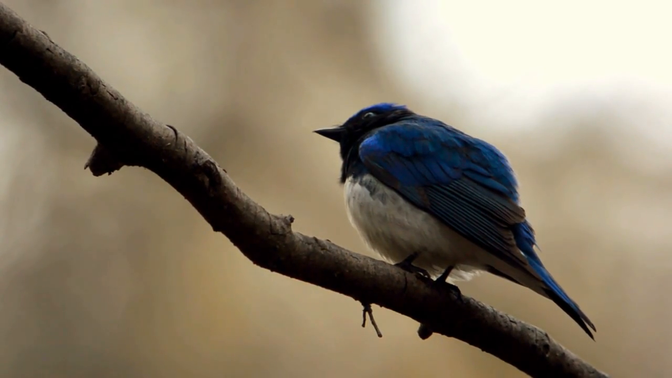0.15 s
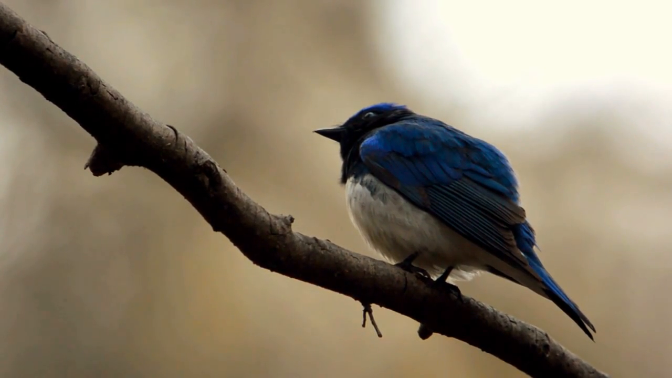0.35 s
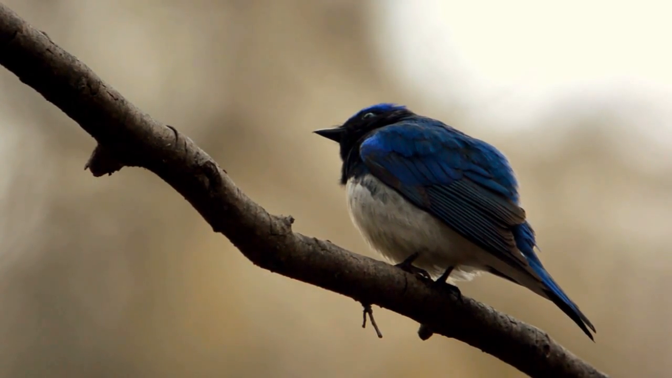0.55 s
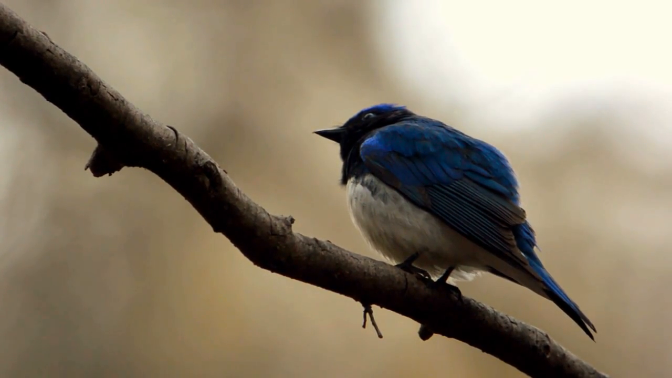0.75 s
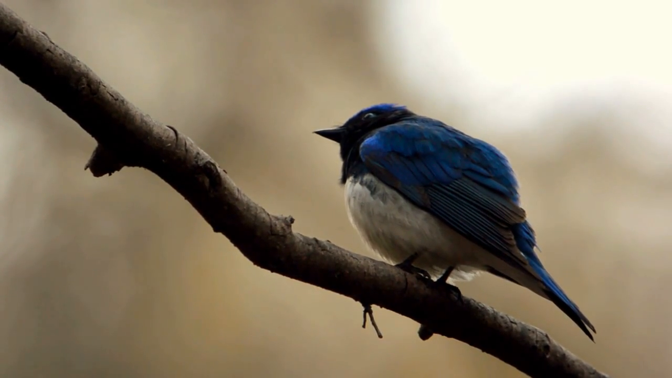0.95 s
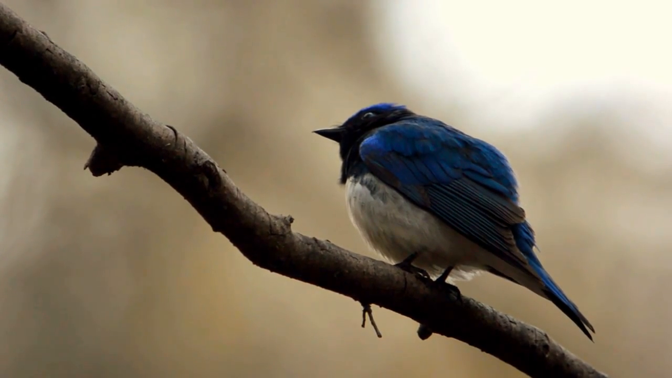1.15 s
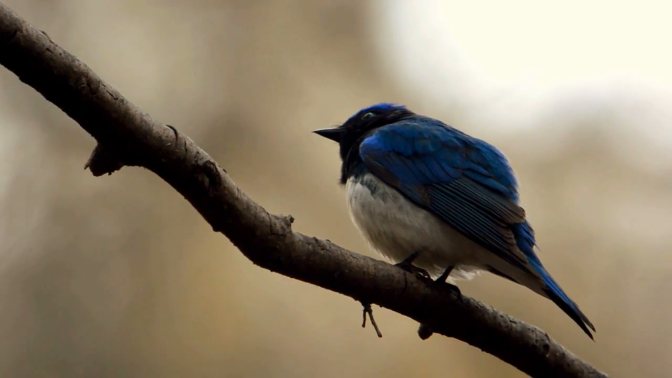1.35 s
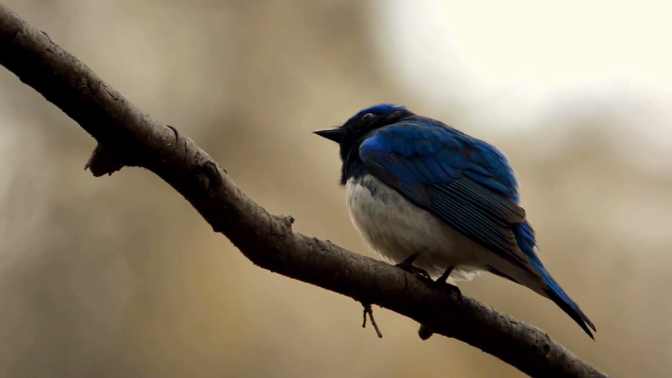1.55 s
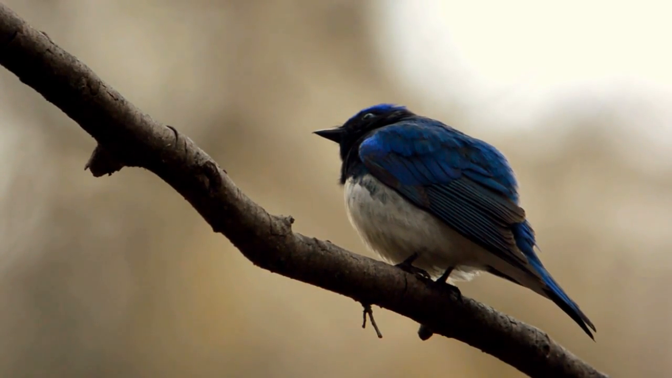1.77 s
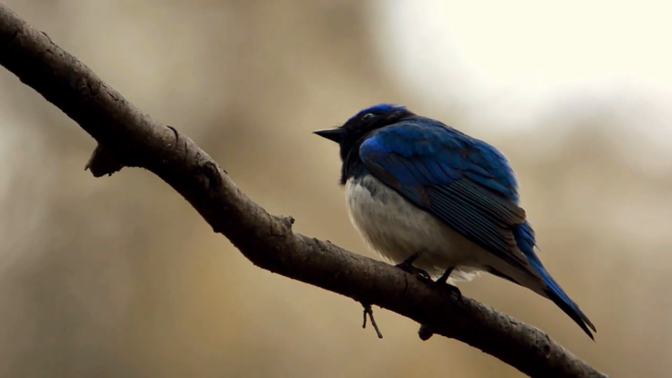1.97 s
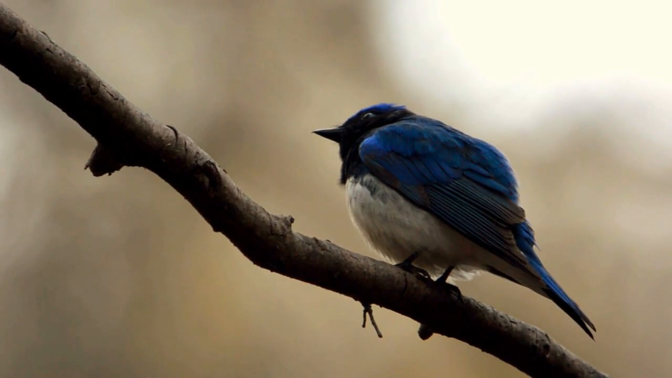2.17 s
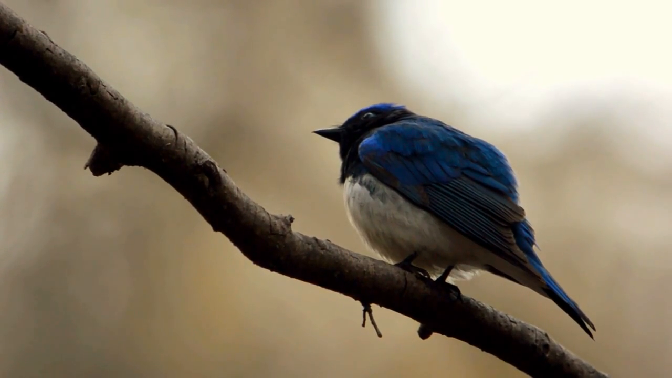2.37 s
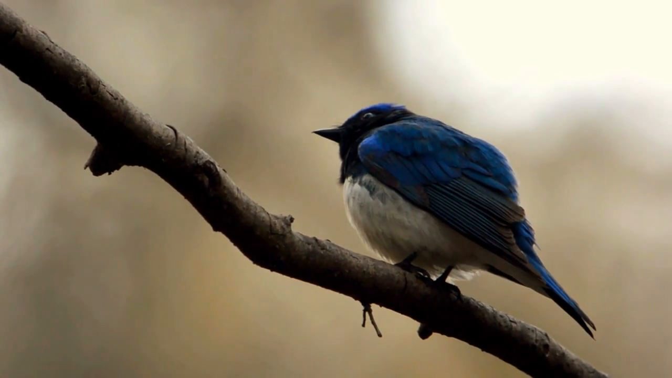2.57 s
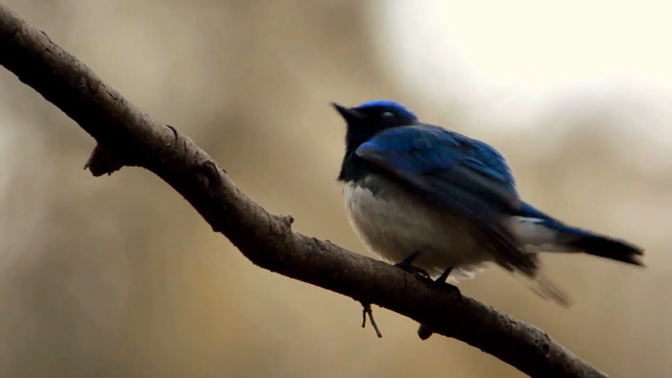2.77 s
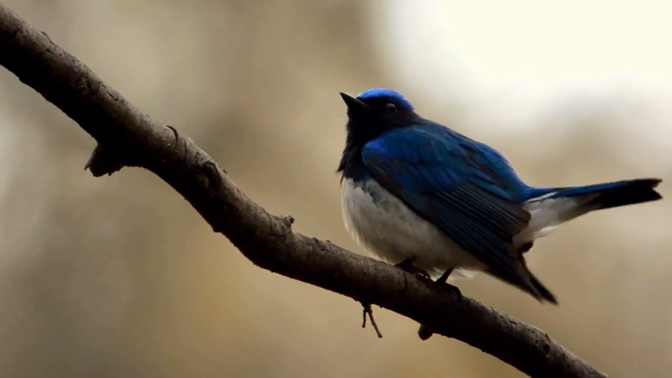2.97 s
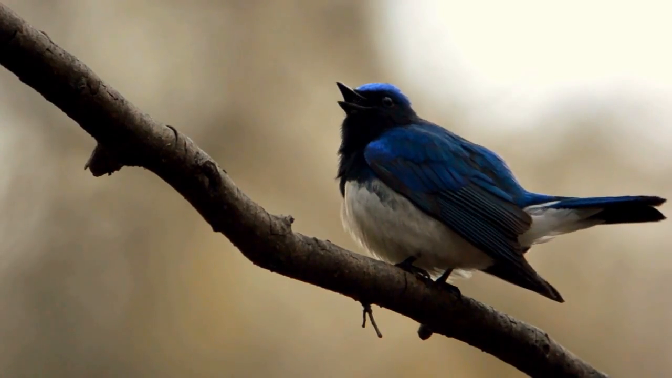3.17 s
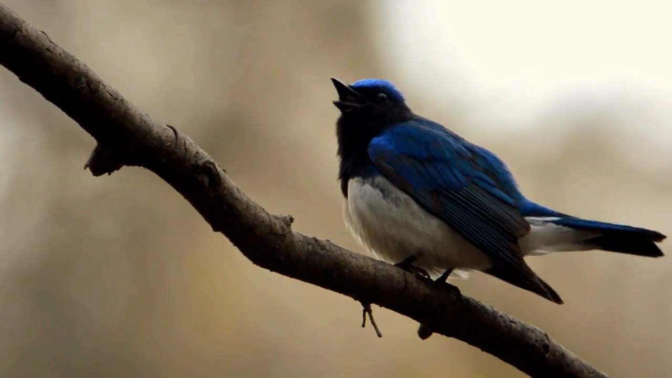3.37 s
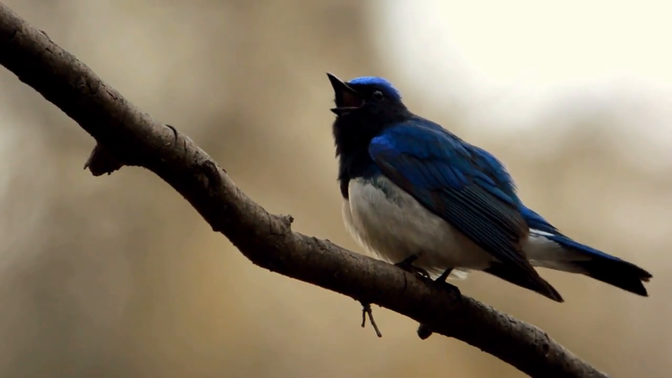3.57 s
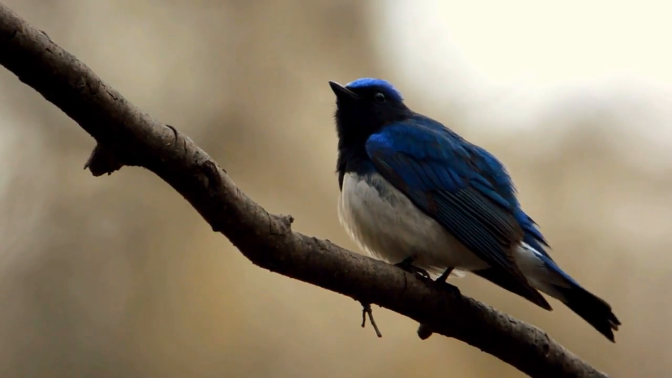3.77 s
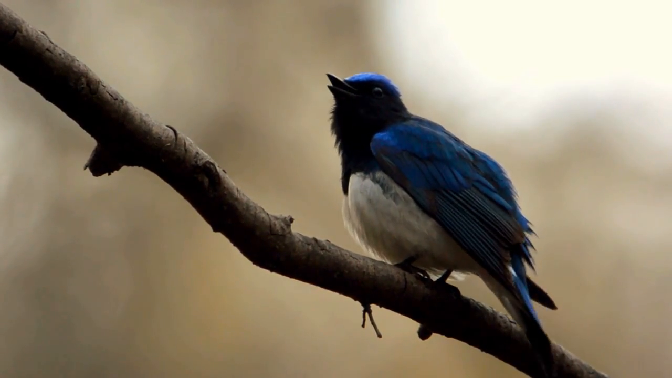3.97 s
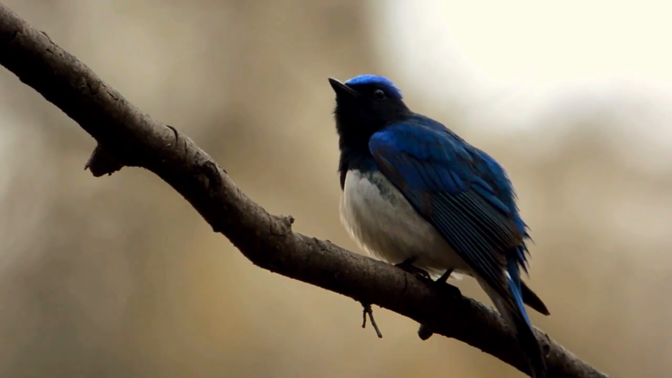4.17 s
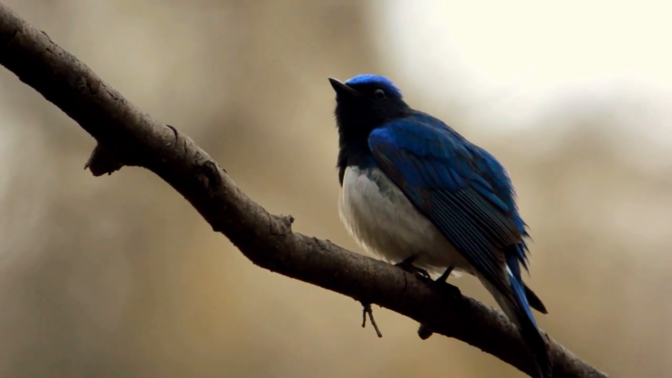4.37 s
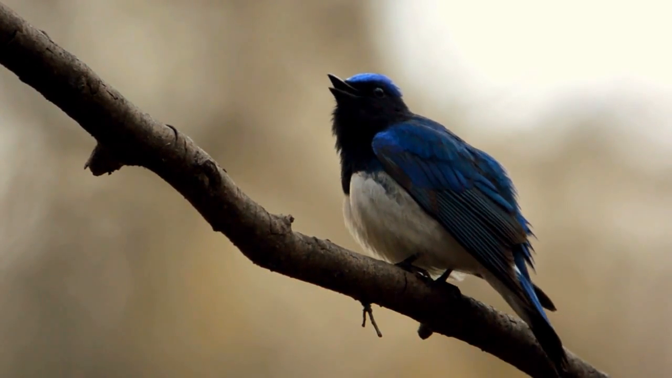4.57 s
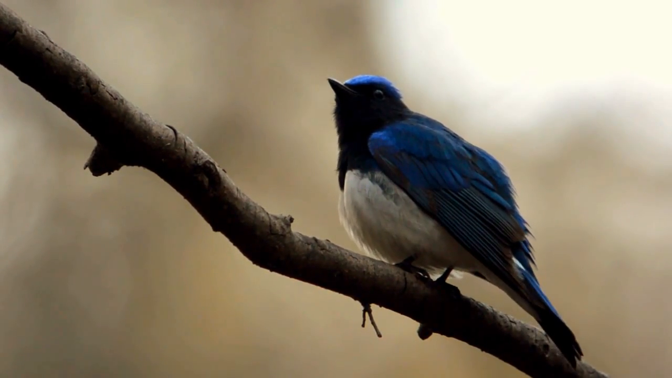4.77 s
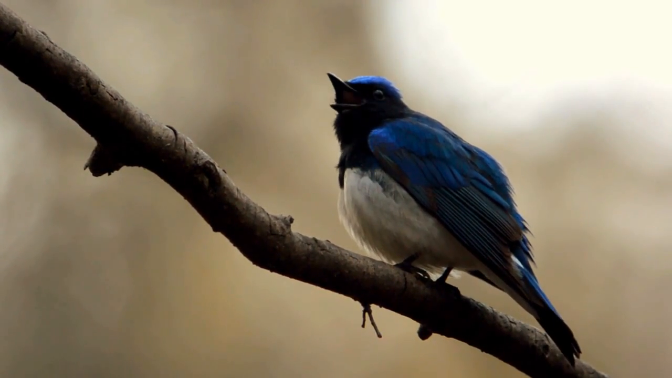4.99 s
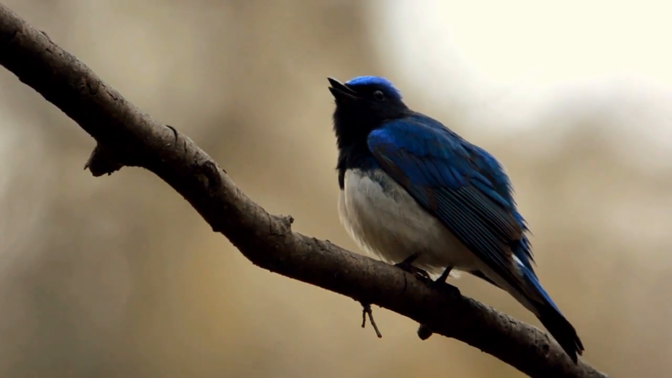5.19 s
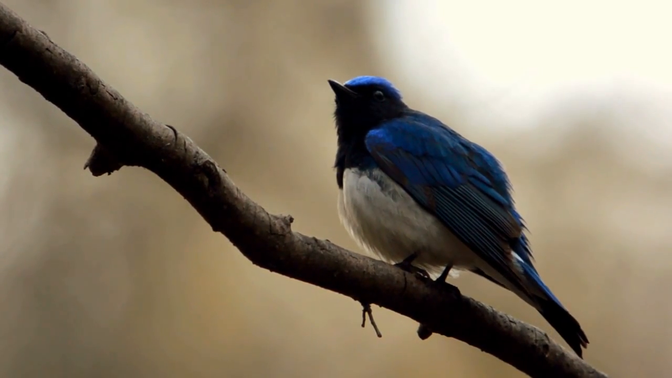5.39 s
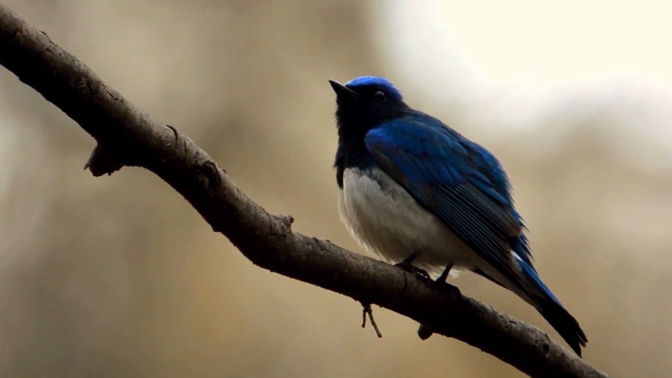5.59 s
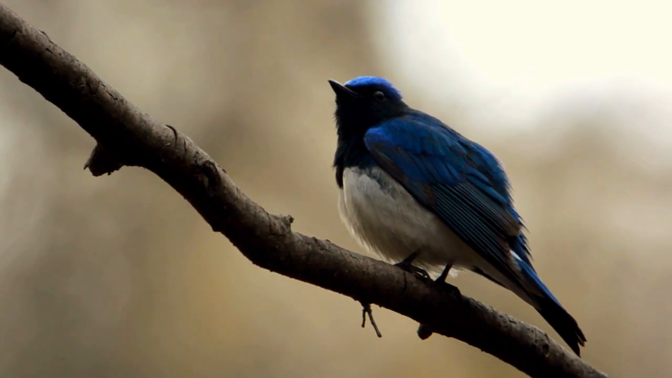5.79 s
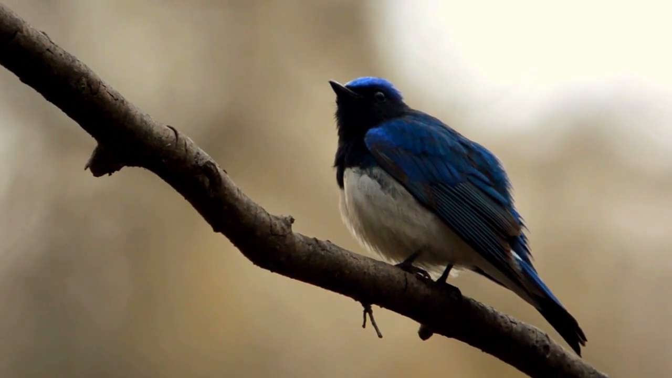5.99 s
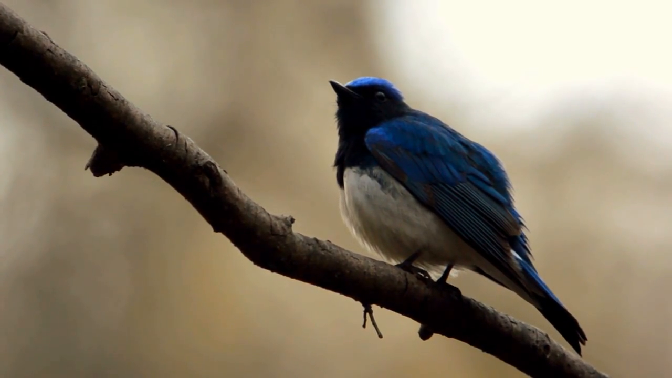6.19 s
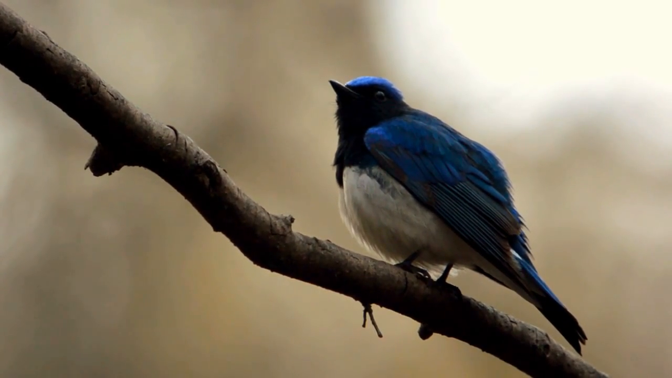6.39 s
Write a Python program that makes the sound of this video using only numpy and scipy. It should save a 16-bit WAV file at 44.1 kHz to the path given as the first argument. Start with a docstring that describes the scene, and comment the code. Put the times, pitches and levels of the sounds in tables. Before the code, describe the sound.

A stream rushes and gurgles while faint distant birds whistle and buzz, then a nearby songbird sings loud rising whistles and lower warbles in echoing woods.

```python
"""A stream rushes and gurgles a little to the right (noise and ringing bubbles), with drops and small ticks.
A distant bird whistles and a rival on the left chirps, slurs and ends in a rising buzz: gliding sines.
Then a flycatcher sings three rising whistles, two pairs of lower warbled notes and a thin high note
over soft ticks. Tree trunks and thicket throw every bird note back as delayed copies and scattered echo."""
import sys
import numpy as np
from scipy import signal
from scipy.fft import rfft, irfft, next_fast_len
from scipy.io import wavfile
from scipy.ndimage import uniform_filter1d

SR = 44100
rng = np.random.default_rng(int(sys.argv[2]) if len(sys.argv) > 2 else 0)


def log_audio(samples):
    """Write samples as a 16-bit WAV file to the path given in sys.argv[1]."""
    # one column per channel
    frames = np.atleast_2d(samples).T
    # limit to full scale, then quantise
    limited = np.clip(frames, -1, 1)
    pcm = np.round(limited * 32767).astype(np.int16)
    wavfile.write(sys.argv[1], SR, pcm)


N = 284004  # length in samples


def amp(db):
    """Turns decibels into a gain."""
    return 10 ** (np.asarray(db) / 20)


def evened(x):
    """Scales a signal to an rms of 1."""
    return x / np.sqrt(np.mean(x ** 2) + 1e-20)


def read(points, hz):
    """Reads a curve between its points along a log-frequency axis."""
    f, value = np.transpose(points)
    return np.interp(np.log(hz + 1), np.log(f + 1), value)


def add(mix, s, sound):
    """Mixes a sound in at time s, cut off where the mix ends."""
    part = mix[max(round(s * SR), 0):][:len(sound)]
    part += sound[:len(part)]


def wobble(n, hz):
    """Smooth random motion of rms about 1: noise with everything much faster than hz taken away."""
    size = next_fast_len(max(n, SR // 2))
    f = np.fft.rfftfreq(size, 1 / SR)
    slow = rfft(rng.standard_normal(size)) * np.exp(-(f / hz) ** 2)
    return evened(irfft(slow, size))[:n]


def delayed(x, s):
    """Delays by any fraction of a sample, by turning the phase of each frequency."""
    size = next_fast_len(N + SR // 4)
    turn = np.exp(-2j * np.pi * np.fft.rfftfreq(size, 1 / SR) * s)
    return irfft(rfft(x, size) * turn, size)[:N]


def placed(x, pan_db, lag_ms):
    """Sound from the right reaches the left side a little later; pan is left minus right level."""
    left = delayed(x, lag_ms / 10 ** 3) * amp(pan_db / 2)
    right = x * amp(-pan_db / 2)
    return np.array([left, right])


def scatter(x, t60, first_s):
    """Echoes from many surfaces: sparse taps of random sign that build up and die away."""
    t = np.arange(SR) / SR
    taps = rng.choice([-1., 1.], (2, SR)) * (rng.random((2, SR)) < 1 / 20)
    taps *= amp(-60 * t / t60) * (1 - np.exp(-(t / first_s) ** 4))
    taps /= np.linalg.norm(taps, axis=1, keepdims=True)
    return signal.fftconvolve(x[None], taps, axes=1)[:, :N]


def wood(x, trunk_db, near_db, deep_db):
    """Three trunks answer at set delays, the thicket starts quickly and the deep wood builds up later."""
    first_trunk = placed(delayed(x, .019), pan_db=1, lag_ms=-.03)
    second_trunk = amp(-2) * placed(delayed(x, .036), pan_db=-1, lag_ms=.01)
    far_trunk = amp(-3) * placed(delayed(x, .084), pan_db=0, lag_ms=-.01)
    trunks = first_trunk + second_trunk + far_trunk
    thicket = scatter(x, t60=.3, first_s=.012)
    deep_wood = scatter(x, t60=0.88, first_s=0.068)
    return amp(trunk_db) * trunks + amp(near_db) * thicket + amp(deep_db) * deep_wood


def tap(hz, octaves, t60):
    """A burst of noise gathered around one pitch that dies away."""
    t, f = np.arange(8192) / SR, np.fft.rfftfreq(8192, 1 / SR)
    colour = np.exp(-.5 * (np.log2((f + 1) / hz) / octaves) ** 2)
    fade = amp(-60 * t / t60) * (1 - np.exp(-t * hz))
    burst = irfft(colour * np.exp(2j * np.pi * rng.random(len(f)))) * fade
    return burst * np.linalg.norm(fade) / np.linalg.norm(burst)


def whistle(notes, waver, overtone_db, buzz=0, buzz_hz=100, fray=0, size=130):
    """The bird's voice: a near sine that glides, wavers, and can fray towards its end or be shaken."""
    out = np.zeros(N)
    for rows in notes:
        s, hz, db = np.transpose(rows)
        t = np.arange(s.min(), s.max(), 1 / SR)
        # corners of both curves are rounded over size samples
        hz = uniform_filter1d(np.interp(t, s, hz), size=size)
        db = uniform_filter1d(np.interp(t, s, db), size=size)
        unsteady = waver + fray * np.linspace(0, 1, len(t)) ** 2
        shake = buzz * np.sin(2 * np.pi * buzz_hz * t)
        hz = hz * (1 + unsteady * wobble(len(t), 250) + shake)
        phase = 2 * np.pi * np.cumsum(hz) / SR
        tone = np.sin(phase) + amp(overtone_db) * np.sin(2 * phase)
        ends = np.clip(np.minimum(t - t[0], t[-1] - t) / 0.00096, 0, 1)  # avoids clicks
        add(out, t[0], np.sqrt(2) * amp(db) * ends * tone)
    return out


def gate(t, attack_s, release_s):
    """A note's opening and closing, in dB."""
    opening = np.minimum(t / attack_s, (t[-1] - t) / release_s)
    return 20 * np.log10(np.clip(opening, 1e-3, 1))


# brief surges of the water: (time [s], half length [s], rise [dB])
WATER_SURGES = [(2.284, 0.054, 7), (2.478, 0.093, 4), (3.4, 0.025, 8.5), (3.735, 0.063, 3.5),
                (5.8, 0.012, 0)]


def surge(t):
    """The splashing's brief rises and falls, in dB."""
    return sum(db * np.exp(-((t - s) / half) ** 2) for s, half, db in WATER_SURGES)


# tone colour of the stream: (frequency [Hz], relative level [dB])
STREAM_COLOUR = [(25, -18), (38, -17.5), (60, -14), (90, -16), (115, -20.5), (150, -25), (200, -14.5),
                 (250, -16), (400, -10.5), (750, -5.5), (1070, -4.5), (1860, -7.5), (2600, -7),
                 (4330, -11.5), (8060, -18), (9600, -27)]
# how alike the left and right sides are: (frequency [Hz], likeness [1 = the same])
LEFT_RIGHT_LIKENESS = [(50, 0.58), (130, 0.24), (500, 0.82), (1100, 0.81), (2400, 0.83), (5000, 0.17),
                       (9000, 0.32)]


def rush(level_db, patchy_db, follow, lag_ms):
    """The stream's wash: coloured noise with drifting patches that follows the surges a little."""
    frames, hz = N // 256 + 5, np.fft.rfftfreq(1024, 1 / SR)
    a, b, c, d, patches = np.moveaxis(rng.standard_normal((frames, 513, 5)), 2, 0)
    patches = uniform_filter1d(patches, size=9, axis=0)  # smooth in time
    patches = evened(uniform_filter1d(patches, size=9, axis=1))  # and in pitch
    swell = surge(np.arange(frames) * 256 / SR)[:, None]
    # how far the level moves at each pitch: least at the bottom
    lively = read([(200, 0.35), (800, 0.73), (2000, 0.61), (5000, 0.79)], hz)
    same = np.clip(read(LEFT_RIGHT_LIKENESS, hz), -1, 1)
    right = a + 1j * b
    left = same * right + np.sqrt(1 - same ** 2) * (c + 1j * d)
    left = left * np.exp(-2j * np.pi * hz * lag_ms / 10 ** 3)
    level = read(STREAM_COLOUR, hz) + lively * (patchy_db * patches + follow * swell)
    z = np.array([left, right]) * amp(level)
    wash = signal.istft(z.swapaxes(1, 2), nperseg=1024, noverlap=768)[1][:, :N]
    return amp(level_db) * evened(wash) * amp([[-.3], [.3]])  # right side a little louder


def gurgle(level_db, per_s, spread_db, count=40):
    """Bubbles of many sizes ring for a few cycles each, rising slightly in pitch."""
    t, out = np.arange(2048) / SR, np.zeros(N)
    for hz in np.geomspace(540, 2100, count):
        cycles = hz * t
        fade = (1 - np.exp(-cycles)) * np.exp(-cycles / 6)
        bubble = fade * np.sin(2 * np.pi * cycles * (1 + 3 * t))
        starts = rng.random(N) < per_s / count / SR
        strengths = amp(spread_db * np.minimum(rng.exponential(1, N), 4)) * starts
        colour_db = read([(540, -6.5), (900, 2.5), (1400, 0.0), (2100, 3.0)], hz)
        out += amp(colour_db) * signal.oaconvolve(strengths, bubble)[:N]
    out = amp(level_db) * evened(out)
    return placed(out, pan_db=-0.2, lag_ms=0.092) + amp(-11.5) * scatter(out, t60=0.25, first_s=0.017)


def stream():
    """Steady wash plus bubbles whose level surges and swells slowly at random."""
    wash = rush(level_db=-49.91, patchy_db=2.5, follow=0.25, lag_ms=.11)
    bubbles = gurgle(level_db=-57.23, per_s=260, spread_db=3.7)
    splashing_db = surge(np.arange(N) / SR) + 1.2 * wobble(N, hz=3)
    return wash + bubbles * amp(splashing_db)


# drops, small ticks and one soft murmur of the water at 5.97 s:
# (time [s], level [dB], pitch [Hz], spread [octaves], fade rate as time per 60 dB [s])
WATER_DROPS = [(.295, -35.5, 3930, 0.16, 0.021), (.586, -42, 4400, .08, .025),
               (.639, -33.5, 1926, 0.12, 0.037), (.864, -48, 1265, 0.049, 0.1),
               (.90, -42.5, 960, 0.035, 0.073), (.911, -42, 6700, 0.035, 0.025),
               (0.987, -43, 1170, 0.25, 0.043), (1.214, -43.5, 840, 0.086, 0.087),
               (1.726, -40.5, 7000, 0.27, 0.01), (1.902, -41, 4700, .13, 0.016),
               (2.079, -45, 6940, 0.47, 0.018), (2.289, -43.5, 1840, 0.32, 0.17),
               (2.47, -43, 1000, 0.15, 0.058), (3.105, -43, 6040, 0.12, 0.023),
               (3.129, -42, 900, 0.082, 0.033), (3.712, -42.5, 830, .1, 0.035),
               (4.276, -40, 1000, 0.14, 0.067), (5.624, -40.5, 1030, 0.19, 0.046),
               (5.801, -37.5, 761, 0.036, 0.061), (5.97, -49.5, 1670, 0.39, 0.96),
               (6.181, -39, 950, 0.092, 0.031), (6.29, -45, 1070, .08, 0.082)]


def drops():
    """Drops, small ticks and one soft murmur: noise around one pitch, each fading at its own rate."""
    out = np.zeros(N)
    for s, db, hz, octaves, t60 in WATER_DROPS:
        add(out, s, amp(db) * tap(hz, octaves, t60))
    return placed(out, pan_db=-1, lag_ms=0.093) + amp(-13) * scatter(out, t60=0.3, first_s=0.0086)


SWOOP_FADE_DB = 8.5  # how much weaker either end of a swoop is than its turn
SWOOP_BEND = 1.6  # how round the turn is (1 = a sharp corner)


def swoop(s, length, turn, start_hz, turn_hz, end_hz, db):
    """A note that glides into a turning point, lingers there at its loudest and glides away."""
    t = np.arange(0, length, 1 / SR)
    u, turn = t / length, np.clip(turn, .05, .95)
    away = np.interp(u, [0, turn, 1], [1, 0, 1])
    outer_hz = np.where(u < turn, start_hz, end_hz)
    hz = turn_hz + (outer_hz - turn_hz) * away ** SWOOP_BEND
    return np.column_stack([s + t, hz, db - SWOOP_FADE_DB * np.sqrt(away)])


# swoops of a bird deep in the wood: (time [s], length [s], turn [share of the length],
# start pitch [Hz], turn pitch [Hz], end pitch [Hz], level at the turn before the mix [dB])
FAR_SWOOPS = [(0.478, 0.054, 0.5, 3780, 3868, 3800, -48), (.56, .145, 0.89, 3803, 3760, 3780, -59),
              (0.681, 0.027, 0.5, 4760, 3970, 5200, -51.5), (0.819, 0.089, 0.42, 5130, 4710, 3900, -51.5),
              (0.958, 0.108, 0.39, 4280, 4400, 4750, -56), (1.095, 0.054, 0.71, 4490, 4835, 4470, -52),
              (1.145, 0.045, 0.67, 4300, 3990, 4160, -57), (1.19, 0.035, 0.59, 4580, 5180, 5000, -57),
              (1.224, 0.09, 0.32, 3140, 3170, 3050, -55), (1.37, 0.086, .85, 4700, 4650, 4630, -65),
              (1.411, 0.074, 0.87, 3590, 3664, 3520, -52), (1.648, 0.055, 0.65, 3640, 3770, 3700, -55),
              (3.938, .065, 0.4, 4180, 3990, 3850, -51.5)]


def far_bird():
    """Faint gliding whistles that are mostly echo."""
    far = amp(1.1) * whistle([swoop(*row) for row in FAR_SWOOPS], waver=0.0044, overtone_db=-67)
    direct = placed(amp(-2) * far, pan_db=0, lag_ms=-.045)
    return direct + wood(far, trunk_db=-12, near_db=-3.5, deep_db=-2)


BUZZ_HZ, BUZZ_JITTER = 174.7, .03  # swings a second and their unevenness
BUZZ_TOP_DB = 12  # how much weaker the top of a swing is


def trill(rows):
    """One voice swings between two pitches so fast that it buzzes, loudest at the bottom of each swing."""
    s, *columns = np.transpose(rows)
    t = np.arange(s[0], s[-1], 1 / SR)
    low_hz, high_hz, db = (np.interp(t, s, c) for c in columns)
    turns = np.cumsum(BUZZ_HZ * (1 + BUZZ_JITTER * wobble(len(t), 60))) / SR
    up = .5 + .5 * np.sin(2 * np.pi * turns)
    return np.column_stack([t, low_hz + (high_hz - low_hz) * up, db - BUZZ_TOP_DB * up])


# thin opening chirps, one curve each: (time [s], pitch [Hz], level [dB])
CHIRP_CURVES = [
    [(.198, 8900, -59), (.213, 6750, -53), (.224, 7820, -55), (.234, 6700, -51), (.245, 4380, -54)],
    [(.45, 6250, -53), (.461, 5240, -46)],
    [(.459, 7670, -51), (.466, 6350, -49), (.47, 7530, -52), (.476, 5100, -49)],
    [(.563, 6900, -53), (.571, 6150, -54), (.583, 7170, -55), (.634, 8700, -67), (.66, 8100, -62)],
]
# slurred whistles, one curve each: (time [s], pitch [Hz], level [dB])
SLUR_CURVES = [
    [(1.732, 6000, -53), (1.767, 5720, -37), (1.789, 5850, -54), (1.812, 6730, -48), (1.842, 7000, -61),
     (1.895, 6550, -48), (1.92, 5980, -36.5), (1.945, 5740, -42)],
    [(2.04, 4950, -52), (2.063, 4380, -41), (2.075, 4800, -49), (2.086, 5560, -35.5), (2.104, 5680, -42),
     (2.124, 5720, -34.5), (2.139, 6050, -43), (2.147, 7000, -44.5), (2.155, 7300, -52), (2.162, 8400, -55)],
    [(2.206, 5650, -44), (2.232, 5200, -41), (2.25, 4880, -36.5), (2.262, 4850, -45)],
]
# the rising buzz at the end: (time [s], bottom pitch [Hz], top pitch [Hz], level at the bottom [dB])
RISING_BUZZ = [(2.312, 4150, 5600, -53), (2.36, 4170, 6400, -45.5), (2.46, 4330, 6960, -43.5),
               (2.55, 4580, 7340, -40), (2.62, 4930, 7420, -39.5), (2.672, 5210, 7700, -37.5),
               (2.695, 5860, 8600, -45), (2.722, 6450, 8600, -50)]


def rival():
    """A nearer bird on the left: gliding chirps and slurs, then a voice swung fast between two pitches."""
    chirps = whistle(CHIRP_CURVES, waver=0.018, overtone_db=-62)
    slurs = whistle(SLUR_CURVES, waver=0.0042, overtone_db=-57)
    buzz = whistle([trill(RISING_BUZZ)], waver=0.013, overtone_db=-54, size=12)
    voice = chirps + slurs + buzz
    direct = placed(voice, pan_db=1.7, lag_ms=-0.0822)
    return direct + wood(voice, trunk_db=-19, near_db=-5.5, deep_db=-15.5)


# the thin high note: (time [s], pitch [Hz], level [dB])
THIN_CURVE = [(5.028, 6780, -57.5), (5.05, 6830, -40.5), (5.071, 6730, -34.5), (5.077, 6680, -44),
              (5.087, 6750, -42), (5.092, 6780, -29.5), (5.113, 6930, -41), (5.132, 6900, -40),
              (5.141, 6680, -39), (5.146, 7100, -43), (5.154, 6800, -42), (5.165, 6900, -48),
              (5.177, 6620, -40), (5.184, 6980, -52), (5.194, 6850, -40), (5.203, 6430, -43)]
# the soft rasp it frays into: (time [s], pitch [Hz], level [dB])
RASP_CURVE = [(5.206, 7450, -49), (5.235, 6960, -60), (5.265, 7520, -55), (5.32, 7130, -63)]
# quick upward flicks: (time [s], length [s], from pitch [Hz], to pitch [Hz], level at the middle [dB])
UPWARD_FLICKS = [(5.119, 0.0132, 3590, 4860, -42.5), (5.181, 0.016, 3630, 5150, -42),
                 (5.249, 0.0144, 3580, 5230, -49)]
# dry ticks at the end of a whistle and around the last note: (time [s], level [dB], pitch [Hz])
DRY_TICKS = [(3.557, -42.5, 4890), (4.881, -42, 3900), (4.901, -42, 4940), (4.917, -60, 7000),
             (4.944, -46, 5000), (4.95, -47, 5450), (5.056, -37.5, 3100), (5.078, -38.5, 5360),
             (5.256, -37.5, 3160), (5.279, -41, 5300), (5.321, -46, 5600)]


def flycatcher_ending():
    """A thin note that frays into a shaken rasp, with swept flicks and short ringing ticks."""
    thin = whistle([THIN_CURVE], waver=0.0025, overtone_db=-60, fray=0.0074)
    thin += whistle([RASP_CURVE], waver=0.036, overtone_db=-60, buzz=0.034, buzz_hz=110)
    sweeps = []
    for s, length, from_hz, to_hz, db in UPWARD_FLICKS:
        middle = (s + length / 2, (from_hz + to_hz) / 2, db)
        sweeps.append([(s, from_hz, db - 6), middle, (s + length, to_hz, db - 6)])
    ticks = whistle(sweeps, waver=0.012, overtone_db=-16.5)
    for s, db, hz in DRY_TICKS:
        add(ticks, s, amp(db) * tap(hz, octaves=0.45, t60=0.024))
    direct = placed(thin, pan_db=9, lag_ms=.03) + placed(ticks, pan_db=-2, lag_ms=-.017)
    return direct + wood(thin + ticks, trunk_db=-13, near_db=-5.5, deep_db=-18)


RISE_ATTACK_S, RISE_RELEASE_S = .01, 0.0017


def upslur(rows):
    """One of the loud whistles: its pitch follows the given curve and it stops short."""
    s, hz, db = np.transpose(rows)
    t = np.arange(0, s[-1] - s[0], 1 / SR)
    level = np.interp(s[0] + t, s, db) + gate(t, RISE_ATTACK_S, RISE_RELEASE_S)
    return np.column_stack([s[0] + t, np.interp(s[0] + t, s, hz), level])


# each warble scoops up to its top from this far below, in this share of the time to its first dip
SCOOP_HZ, SCOOP_SHARE = 1240, .85
DIP_S = .0055  # half width of a dip
DIP_DB_PER_KHZ = 13  # the voice weakens as it drops below its top
WARBLE_ATTACK_S, WARBLE_RELEASE_S = 0.003, 0.0075


def warble(s, length, top_hz, db, first_s, every_s, *depths_hz):
    """A note that scoops up to its top, then dips at an even pace, each time by its own depth."""
    t = np.arange(0, length, 1 / SR)
    dips = sum(depth * np.exp(-((t - first_s - k * every_s) / DIP_S) ** 2)
               for k, depth in enumerate(depths_hz))
    scoop = SCOOP_HZ * np.maximum(1 - t / (SCOOP_SHARE * first_s), 0) ** 2
    below_hz = scoop + dips
    level = db - DIP_DB_PER_KHZ * below_hz / 10 ** 3 + gate(t, WARBLE_ATTACK_S, WARBLE_RELEASE_S)
    return np.column_stack([s + t, top_hz - below_hz, level])


# reflections off the ground and close wood: (left delay [ms], right delay [ms], level [dB])
CLOSE_BOUNCES = [(3.875, 3.675, -8), (5.025, 5.025, -18), (9.2, 9.475, -11)]


def bounced(pair):
    """Close reflections beat with a gliding note and make it throb."""
    out = pair.copy()
    for *both_ms, db in CLOSE_BOUNCES:
        out += amp(db) * np.array([delayed(x, ms / 10 ** 3) for x, ms in zip(pair, both_ms)])
    return out


# rising whistles, one curve each: (time [s], pitch [Hz], level [dB])
RISE_CURVES = [
    [(3.243, 4020, -41), (3.288, 4070, -30.5), (3.302, 4230, -27), (3.322, 4270, -30), (3.343, 4354, -25.5),
     (3.361, 4510, -28), (3.374, 4532, -22), (3.392, 4683, -33.5)],
    [(3.464, 3816, -40), (3.473, 4040, -31.5), (3.484, 4050, -29), (3.507, 4237, -26), (3.524, 4337, -24),
     (3.537, 4472, -24), (3.563, 4575, -23.5)],
    [(3.634, 4200, -30), (3.657, 4334, -28.5), (3.678, 4560, -25), (3.70, 4806, -24), (3.711, 5005, -28.5),
     (3.717, 5260, -35.5), (3.723, 4035, -40)],
]
# lower warbled notes: (time [s], length [s], top pitch [Hz], level [dB], first dip after [s],
# time between dips [s], depth of first dip [Hz], of second [Hz], of third [Hz])
WARBLED_NOTES = [(4.017, .099, 3680, -29, .049, .0175, 200, 400, 60),
                 (4.131, .073, 3830, -27.6, .046, .022, 270, 600, 0),
                 (4.576, .087, 3690, -29.6, .046, .0195, 680, 900, 650),
                 (4.692, .077, 3810, -28.6, .044, .0215, 460, 980, 600)]


def flycatcher_song():
    """The loud phrase: climbing whistles and dipping warbles, thickened by close reflections and echo."""
    rises = whistle([upslur(rows) for rows in RISE_CURVES], waver=0.0029, overtone_db=-40.0)
    warbles = whistle([warble(*row) for row in WARBLED_NOTES], waver=.006, overtone_db=-54)
    upper = placed(rises, pan_db=-1.8, lag_ms=-0.017)
    lower = placed(warbles, pan_db=-6, lag_ms=-.018)
    into_wood = rises + amp(1.3) * warbles  # the lower notes wake more echo
    return bounced(upper + lower) + wood(into_wood, trunk_db=-21.5, near_db=-6.0, deep_db=-12.5)


def scene():
    """Stream and drops, then the far bird, the rival and the flycatcher, summed."""
    water = stream() + drops()
    other_birds = far_bird() + rival()
    return water + other_birds + flycatcher_ending() + flycatcher_song()


def record(dry):
    """Removes the treble above a steep edge and adds a small steady offset."""
    edge_hz, offset = 9750, .0025
    low_pass = signal.firwin(301, edge_hz, window=("kaiser", 8), fs=SR)
    return offset + signal.oaconvolve(dry, low_pass[None], "same")


dry = scene()
out = record(dry)
log_audio(out)
```